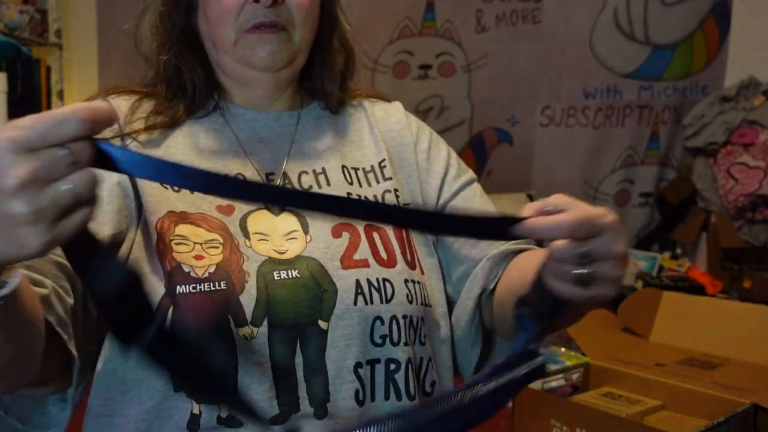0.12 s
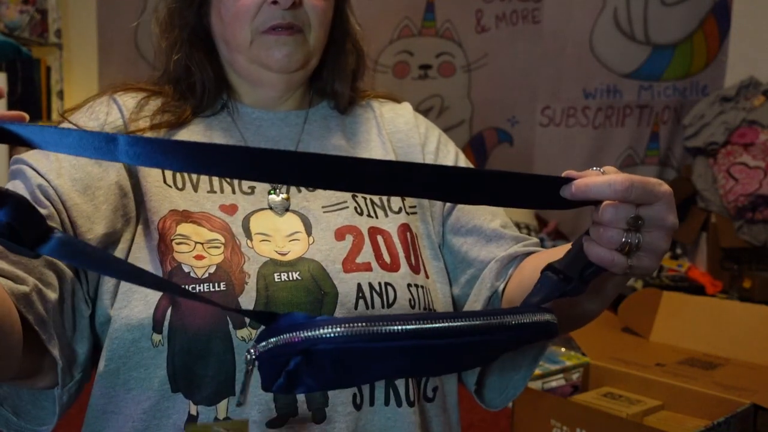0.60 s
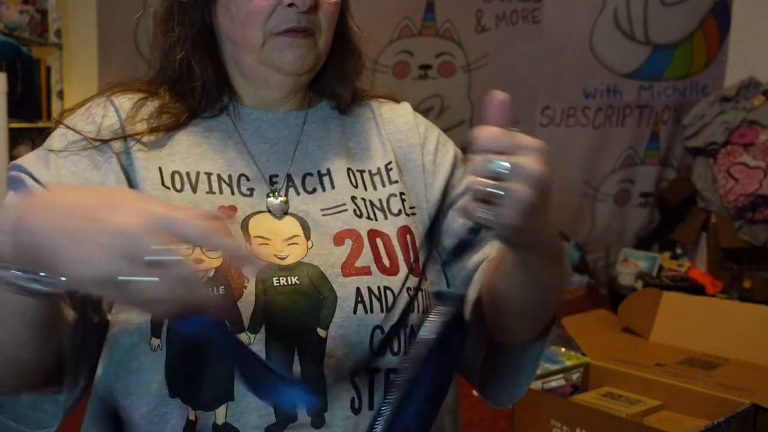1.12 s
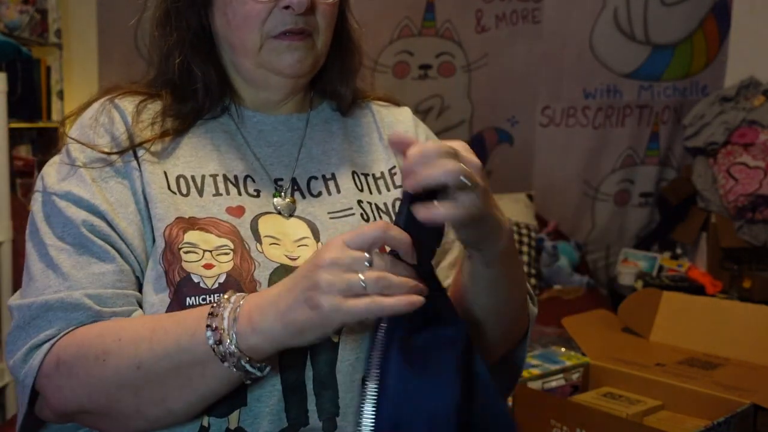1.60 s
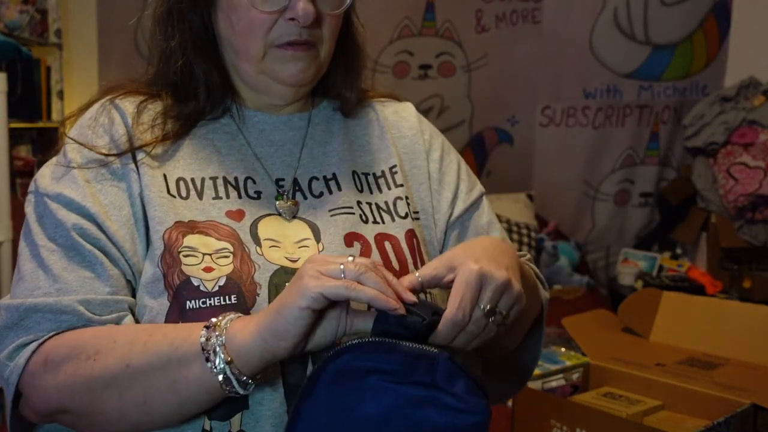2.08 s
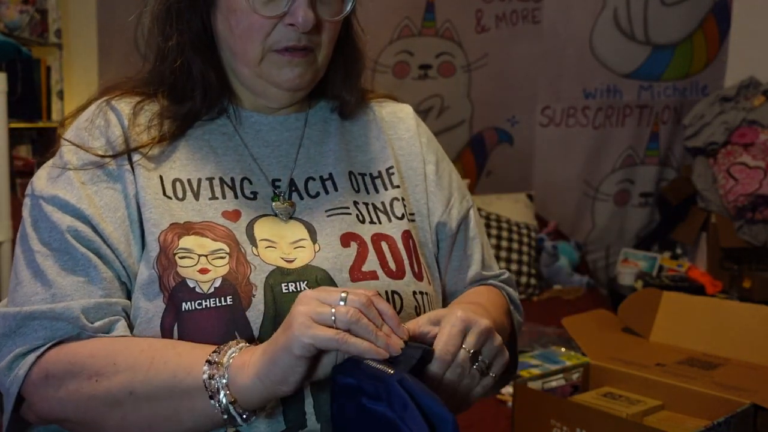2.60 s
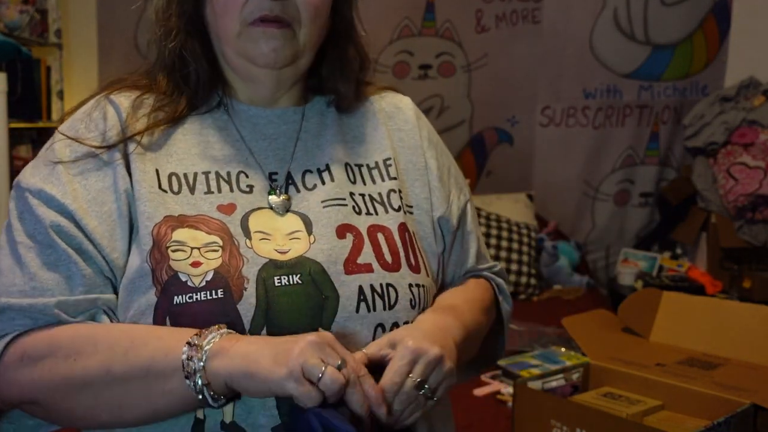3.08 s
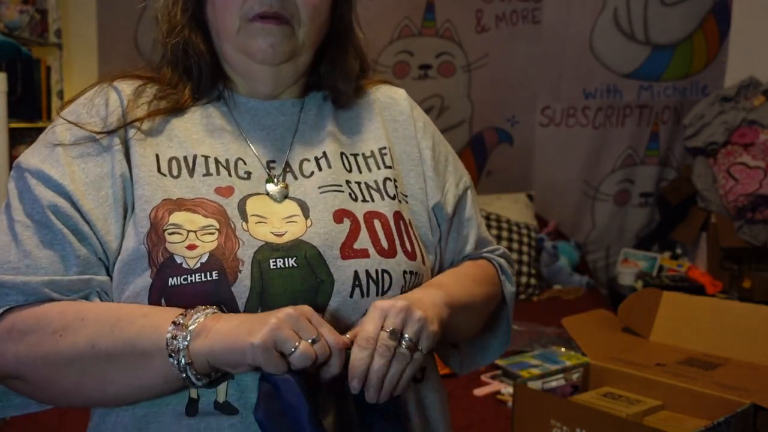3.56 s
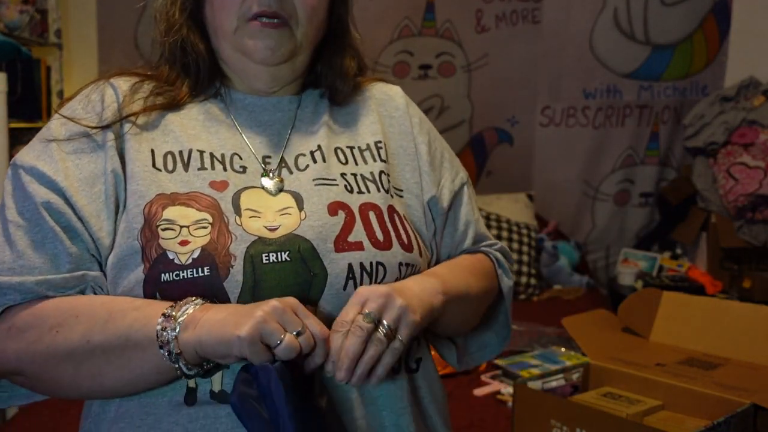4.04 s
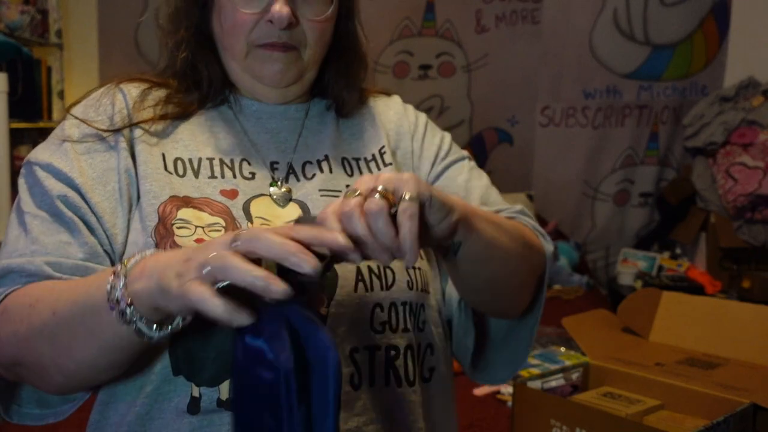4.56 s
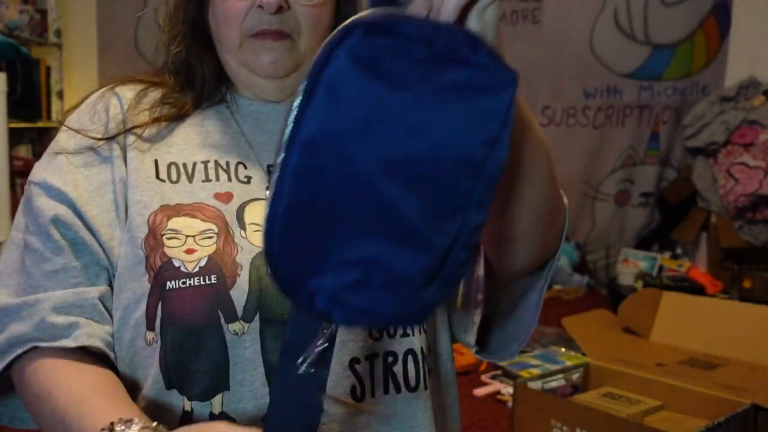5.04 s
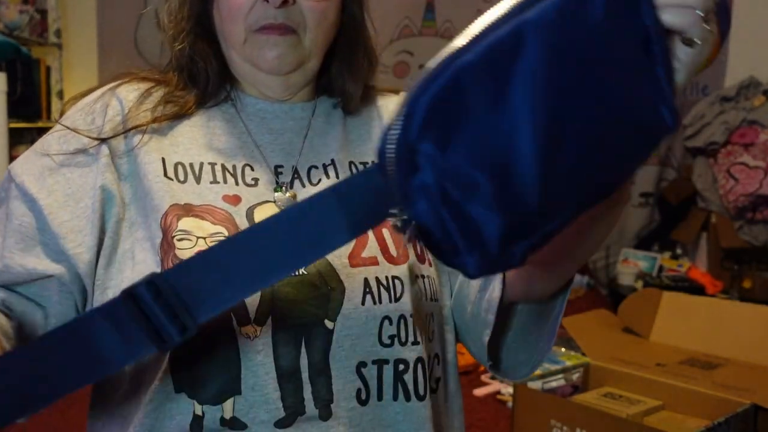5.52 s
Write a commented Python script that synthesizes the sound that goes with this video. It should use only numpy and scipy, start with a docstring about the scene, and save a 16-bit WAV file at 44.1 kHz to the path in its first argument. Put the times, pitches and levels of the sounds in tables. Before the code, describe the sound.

Over a faint, steady, wide airy hush, nylon cloth crackles in short strokes, with tiny taps and scrapes from seams, rings and buckle. Padded low bumps join after the first second. The sound thins out, then a bright cluster of clinks arrives around four seconds; the final second is busiest, with rustle, buckle clack and zip-pull tinkle. Close, fairly dry stereo.

```python
"""Small furnished room, a stereo camera close to hands that turn a nylon belt bag and its strap.
From start to end a soft fan-like hush with two humps lies behind: shaped noise, mostly unrelated left and right.
At once the cloth rustles and crackles, as noise in strokes; buckle, rings and seams tap and scrape, as struck modes.
From 0.6 s small hard parts ring as decaying sines, and from 1.4 s the bag bumps a hand with soft low pushes.
Louder clinks come near 3.9 s, the buckle clacks at 5.3 s, and the metal zip pull tinkles most in the last second."""
import sys
import numpy as np
from scipy import signal
from scipy.io import wavfile
from scipy.ndimage import uniform_filter1d

SR = 44100
rng = np.random.default_rng(int(sys.argv[2]) if len(sys.argv) > 2 else 0)


def voltage_ratio(decibels):
    """Convert decibels (scalar or array-like) to amplitude ratios, 20 dB per decade."""
    exponent = np.asarray(decibels, float) / 20
    return 10 ** exponent


def wrap_up_sound(samples):
    """Save the sound to the file named by the first command line argument, as 16-bit audio."""
    columns = np.atleast_2d(samples).T
    # keep every value between -1 and 1, then stretch to whole-number steps
    tamed = np.clip(columns, -1, 1)
    steps = np.round(tamed * 32767).astype(np.int16)
    wavfile.write(sys.argv[1], SR, steps)


N = 249165  # samples

# spectrum shape of the hush, before the humps: [f/Hz, relative level/dB per Hz]
HUSH_SPECTRUM = [(15, -70), (30, -45), (60, -18), (125, -1), (250, 1.5), (500, -1.5), (1100, -3),
                 (1600, -4), (2250, -2), (2450, -8), (4500, -14.5), (8000, -21), (16000, -26.5)]
# resonances in the hush: [f/Hz, width/Hz, gain/dB]
HUSH_HUMPS = [(859, 69, 12.5), (2130, 92, 5.5)]
# left-right likeness of the hush at the microphones: [f/Hz, likeness 0 to 1]
HUSH_LIKENESS = [(30, 0.77), (70, 0.72), (130, 0.86), (250, 0.04), (600, 0.13), (1650, 0.03), (5000, 0.022),
                 (15000, 0.79)]
# early reflections: [delay/ms, left level/dB, right level/dB], against the direct sound
EARLY_ECHOES = [(5.8, -14.5, -14), (10, -22, -25), (12, -19, -23), (18, -23, -24)]
# decay of the room: [f/Hz, t60/s]
ROOM_DECAY = [(300, 0.22), (1300, 0.18), (3500, 0.11), (9000, 0.19), (14000, 0.081)]
# the padded bag bumps a hand: [t/s, peak level/dB, f/Hz]
HAND_BUMPS = [(1.389, -55, 330), (1.39, -48.5, 504), (1.391, -50, 850), (1.451, -53, 294),
              (1.452, -48, 474), (1.453, -52, 854), (1.885, -45.5, 875), (2.174, -48.5, 770),
              (3.318, -53.5, 760), (4.233, -50, 790), (4.251, -59.5, 135), (4.59, -61, 215),
              (4.591, -41, 830), (4.806, -48, 840), (4.944, -38.5, 890), (5.107, -35, 790),
              (5.009, -46.5, 824), (5.162, -41, 854), (5.403, -42, 833)]
# touches after which a part goes on ringing: [t/s, level/dB, part]
CLINK_TOUCHES = [(0.602, -43.5, "tab"), (1.318, -57, "bead"), (1.431, -39, "tooth"), (1.692, -49.5, "pull"),
                 (1.729, -48, "link"), (1.74, -34.5, "link"), (1.746, -33, "clip"), (1.785, -42.5, "ring"),
                 (1.846, -40, "link"), (1.85, -49, "ring"), (1.877, -44.5, "ring"), (1.885, -47, "charm"),
                 (1.947, -42.5, "charm"), (1.949, -46.5, "ring"), (2.175, -48.5, "ring"),
                 (3.051, -38, "catch"), (3.914, -33.5, "clip"), (3.936, -29.5, "catch"),
                 (3.942, -33, "ring"), (3.943, -28, "tab"), (4.237, -39, "pull"), (4.238, -41.5, "tab"),
                 (4.253, -59, "pull"), (4.28, -53, "pull"), (4.373, -37, "slider"), (4.76, -40, "loop"),
                 (5.06, -59, "pull"), (5.08, -54, "pull"), (5.105, -43, "pull"), (5.174, -40.5, "pull"),
                 (5.233, -41.5, "tab"), (5.2916, -22, "buckle"), (5.567, -45.5, "pull"),
                 (5.619, -49, "pull")]
# modes of each small hard part, by name: [f/Hz, level against the touch/dB, t60/s]
PART_MODES = {"pull": [(10000, -1, 0.057)], "tab": [(6800, -3.5, 0.02)], "tooth": [(11500, 1.5, 0.014)],
              "bead": [(14000, 0, 0.14)], "ring": [(3350, 0.5, 0.078), (5260, -7, 0.058)],
              "link": [(5300, -5, 0.029), (5300, -6, .03)], "charm": [(4320, -0.5, 0.055),
              (6200, 1.5, 0.018)], "clip": [(3140, 1.5, 0.025)], "catch": [(6500, -1, 0.018),
              (6050, -8, 0.034)], "slider": [(2134, 5, 0.02), (4800, 0, 0.032), (5950, 3, 0.023),
              (7160, -3.5, 0.089)], "loop": [(2320, -4, .05)], "buckle": [(3004, -2.5, 0.026),
              (4000, -9, 0.017)]}
# taps and short scrapes: [t/s, body level/dB rms over 5 ms, ring f/Hz, crack against body/dB, scrape time/ms]
TAP_EVENTS = [(0.056, -52, 2520, -18, 2.5), (0.3624, -52.5, 1270, -9, 2.1),
              (0.4528, -56.5, 2880, -17, 0.16), (0.5009, -53.5, 3050, -13, 0.77), (0.513, -55, 3000, -9, 2),
              (0.52, -51.5, 2810, -30, 3.3), (0.5371, -42.5, 2830, 0.5, 1.0),
              (0.5415, -47.5, 2400, -10, 0.66), (0.6023, -56, 3140, -6, 0.26),
              (1.0856, -47.5, 4800, 0, 1.6), (1.1779, -53, 2170, -13, 1.8), (1.2068, -48, 4760, -9, 1.4),
              (1.214, -44.5, 1410, -4, 4.4), (1.2911, -48.5, 3330, -13, 2.2), (1.355, -44, 1280, -26, 3.5),
              (1.3901, -37, 2430, -34, 1), (1.4305, -57, 3460, 0, 1.2), (1.4484, -42, 3040, -24, 0.2),
              (1.4526, -40, 2330, -28, 3), (1.4599, -42.5, 2370, -22, 1.6), (1.572, -52, 1240, -14, 0.86),
              (1.6932, -51.5, 1200, -2, 1.9), (1.7278, -46, 5040, -22, 1.6),
              (1.7397, -46.5, 3250, -11, 1.9), (1.7453, -52, 3260, -34, 0.9),
              (1.7672, -46.5, 4770, -18, 0.12), (1.7852, -59, 3340, -8, 0.39),
              (1.8458, -42.5, 5270, -29, 0.24), (1.8642, -46.5, 1160, -20, 1.9),
              (1.8847, -49, 4500, -32, 0.87), (1.947, -50, 4620, -9, 0.48), (1.9937, -44, 2220, -37, 2),
              (2.0793, -42.5, 2200, -20, 1.27), (2.1733, -52.5, 3700, 0, 1.8),
              (2.3472, -54, 2180, -6, 0.76), (3.0158, -45, 1460, -16, 3.3),
              (3.024, -42.5, 1420, -2.5, 0.089), (3.0513, -30, 1480, -27, 0.043),
              (3.1408, -45, 1270, -11, 1.1), (3.1555, -51, 1160, -14, 1), (3.309, -48, 5440, -23, 4),
              (3.3167, -40.5, 4370, -39, 7.8), (3.5603, -54.5, 1870, -19, 1.2),
              (3.6289, -56, 2190, -13, 3.4), (3.9133, -43.5, 3250, -25, 0.91),
              (3.9362, -31.5, 6200, -13, 4.3), (3.9407, -33, 3800, -0.5, 2.2),
              (4.1276, -54.5, 2590, -23, 0.95), (4.2319, -44.5, 1970, -13, 3.4),
              (4.2547, -43.5, 2660, -15, 2.3), (4.3386, -51.5, 3300, -21, 0.11),
              (4.3733, -39, 5040, -3, 4.8), (4.475, -55, 2500, -5, 1), (4.5905, -39.5, 2020, -32.5, 0.38),
              (4.5997, -43.5, 1620, -12, 2.5), (4.6378, -52, 4160, -23, 1.5), (4.7602, -43.5, 2300, -8, 13),
              (4.7864, -37, 3470, -28, 6.5), (4.8065, -36, 4640, -28, 0.8), (4.8813, -47, 3900, -13, 0.31),
              (4.9102, -49, 1410, -12, 0.26), (4.9436, -40.5, 3660, -21, 0.85),
              (5.0093, -46, 1090, -11, 0.14), (5.0719, -59, 3100, -23, 0.14),
              (5.0808, -37.5, 3370, -27, 0.34), (5.1048, -41, 1250, -8, 2), (5.1618, -45.5, 2680, -9, 0.86),
              (5.2915, -26.5, 4000, -4.5, 0.033), (5.3885, -48, 4100, 2.5, 0.49),
              (5.4024, -44.5, 2800, -1, 0.2), (5.4171, -41.5, 3380, -5, 0.34), (5.4362, -48, 3180, -14, 1),
              (5.5619, -52.5, 1480, 4, 0.37), (5.5853, -51.5, 2720, -22, 0.84),
              (5.6236, -48, 1520, -3, 2.4)]
# spectrum shape of the cloth: [f/Hz, relative level/dB per Hz]
CLOTH_SPECTRUM = [(120, -23), (300, -26.5), (600, -7.5), (1500, -5), (4000, -3), (7500, -11.5),
                  (11000, -19), (16000, -32)]
# strokes of the hands over the cloth:
# [peak t/s, rustle level/dB, time to swell 10 dB/ms, time to fade 10 dB/ms, brightness/dB]
HAND_STROKES = [(0.05, -54.5, 300, 213, 5.5), (0.25, -68, 98, 77, 12), (0.54, -62, 144, 143, -2),
                (0.72, -75, 100, 38, 10.5), (1.08, -75, 72, 107, 19.5), (1.22, -55.5, 40, 100, -3),
                (1.3, -55, 114, 102, 3), (1.44, -49, 108, 60, -1.5), (1.58, -57, 89, 164, 3.5),
                (1.76, -58, 95, 150, 3), (1.92, -56, 126, 155, -3), (2.17, -61, 115, 100, -3),
                (2.37, -61, 100, 76, 0), (2.71, -69, 29, 92, 7), (2.82, -64.5, 44, 46, -2),
                (3.03, -52, 57, 120, 0.5), (3.2, -56, 148, 82, 0), (3.36, -62.5, 103, 123, -3),
                (3.6, -61.5, 136, 136, -1), (3.95, -48.5, 23, 50, 3), (4.04, -60.5, 62, 58, -2.5),
                (4.15, -62, 65, 195, 2.5), (4.25, -53.5, 20, 198, -1.5), (4.4, -56, 103, 142, 2.5),
                (4.6, -57.5, 92, 101, -10), (4.785, -47, 108, 47, 5.5), (4.9, -51.5, 134, 168, -2),
                (5.12, -52, 90, 150, -3), (5.3, -52.5, 104, 118, 5), (5.42, -47, 53, 138, 1),
                (5.6, -51.5, 150, 150, 4.5)]
# where the hands are: [t/s, left minus right level/dB]
HAND_SIDE = [(0, 1), (.7, 1), (1.2, -0.5), (1.8, -0.5), (2.2, 0.3), (2.8, -1.5), (3.2, 0.5), (3.9, -0.5),
             (4.3, -0.5), (4.8, 0.2), (5.65, 0)]

HUSH_DB = -60  # rms
ROOM_DB = -6  # diffuse tails against the direct sound
THUD_DB, THUD_DB_PER_OCTAVE = -14, -1  # bag body's answer to a 1 kHz tap, weaker for higher taps
AIR_DB = -19  # the thin top of each crack
TREBLE_DB, BASS_DB, DULL_BASS = -9, -6, 1  # a brighter stroke gains treble and loses bass
MIC_LOW_HZ = 40.6


def evened(x):
    """Scales to rms 1."""
    return x / np.sqrt(np.mean(x ** 2) + 1e-20)


def read(points, hz):
    """Reads a curve on a log-frequency axis."""
    f, value = np.transpose(points)
    return np.interp(np.log(hz + 1), np.log(f + 1), value)


def add(mix, s, sound):
    """Mixes a sound in at time s."""
    part = mix[round(s * SR):][:len(sound)]
    part += sound[:len(part)]


def ring(x, hz, t60):
    """Drives one decaying mode, a two-pole resonator that falls 60 dB in t60 seconds."""
    radius = 1000 ** (-1 / (t60 * SR))
    return signal.lfilter([1], [1, -2 * radius * np.cos(2 * np.pi * hz / SR), radius ** 2], x)


def band(x, low_hz, high_hz):
    """Causal band-pass."""
    edges_hz = [low_hz, min(high_hz, SR / 2.5)]
    return signal.sosfilt(signal.butter(2, edges_hz, "bandpass", fs=SR, output="sos"), x)


def hush():
    """Steady air noise with two resonant humps, mostly unrelated at the two microphones."""
    hz = np.fft.rfftfreq(2048, 1 / SR)
    a, b, c, d = rng.standard_normal((N // 512 + 5, len(hz), 4)).T
    likeness = np.clip(read(HUSH_LIKENESS, hz), -1, 1)[:, None]
    left = a + 1j * b
    right = likeness * left + np.sqrt(1 - likeness ** 2) * (c + 1j * d)
    shape_db = read(HUSH_SPECTRUM, hz)
    for hump_hz, width_hz, gain_db in HUSH_HUMPS:
        shape_db = shape_db + gain_db / (1 + (2 * (hz - hump_hz) / width_hz) ** 2)
    spectrum = np.array([left, right]) * voltage_ratio(shape_db)[:, None]
    noise = signal.istft(spectrum, nperseg=2048, noverlap=1536)[1][:, :N]
    return voltage_ratio(HUSH_DB) * evened(noise)


def room(x):
    """A few early echoes, then three diffuse tails fed in turn, each band dying at its own speed."""
    early = np.zeros((2, SR // 10))
    early[:, 0] = 1  # direct sound
    for ms, left_db, right_db in EARLY_ECHOES:
        early[:, round(ms * SR / 1000)] = voltage_ratio([left_db, right_db])
    out = signal.oaconvolve(x[None], early, axes=1)[:, :N]
    for k in range(3):
        hz, t, z = signal.stft(rng.standard_normal((2, SR // 3)), SR, nperseg=128)
        decay_db = -60 * t / read(ROOM_DECAY, hz)[:, None]
        tail = signal.istft(z * voltage_ratio(decay_db), SR, nperseg=128)[1]
        tail_t = np.arange(tail.shape[1]) / SR
        tail *= np.clip((tail_t - .002) / 0.00078, 0, 1)  # builds up after the direct sound
        tail /= np.linalg.norm(tail[0])
        # the three feeds swing in turn; their powers always sum to one
        feed = np.sqrt(2 / 3) * np.cos(np.pi * (3.1 * np.arange(N) / SR + k / 3))
        out += voltage_ratio(ROOM_DB) * signal.oaconvolve((x * feed)[None], tail, axes=1)[:, :N]
    return out


def bumps(cycles=3.8):
    """Soft low pushes of the padded bag: a sine that swells to its peak in cycles / 3 periods, then dies."""
    out, t = np.zeros(N), np.arange(SR // 8) / SR
    for s, db, hz in HAND_BUMPS:
        u = t * hz * 3 / cycles
        swell = u * np.exp(1 - u)
        add(out, s, voltage_ratio(db) * swell * np.sin(2 * np.pi * hz * t))
    return out


def rings(rattle=0.69):
    """Each touch rings the modes of one part, which waver as the loose part rattles."""
    out, t = np.zeros(N), np.arange(SR // 8) / SR
    for s, db, part in CLINK_TOUCHES:
        hz, mode_db, t60 = np.transpose(PART_MODES[part])[:, :, None]
        chance = rng.standard_normal((2, len(hz), len(t)))
        drift = evened(uniform_filter1d(chance, size=110, axis=2))
        in_phase, quadrature = rattle * np.minimum(t / 0.0044, 1) * drift
        phase = 2 * np.pi * hz * t
        wave = (1 + in_phase) * np.sin(phase) + quadrature * np.cos(phase)
        modes = voltage_ratio(db + mode_db - 60 * t / t60) * wave
        add(out, s, modes.sum(axis=0) * np.minimum(t / 0.00043, 1))  # brief onset ramp
    return out


def taps(ring_t60=0.0055, edge_db=-6, blur_db_per_ms=3.0, slips=0.42, first_ms=2.8):
    """A blow, then a rattle of smaller slips, rings the touched part, the bag body and a sharp crack."""
    out, t = np.zeros(N), np.arange(2048) / SR
    for s, db, hz, crack_db, ms in TAP_EVENTS:
        chance = rng.standard_normal(len(t))
        u = 1000 * t / max(ms, .05)
        blow = slips * chance * np.abs(np.roll(chance, 1)) * np.sqrt(u) * np.exp(1 - u)
        blow[0] = -np.exp(-ms / first_ms)  # long scrapes start softly
        edge = band(blow, 1570, min(2.57 * hz, 6500))  # deep parts give dull edges
        broad = voltage_ratio(edge_db + blur_db_per_ms * ms)  # long scrapes are cloth: more noise, less ring
        body = evened(evened(ring(edge, hz, ring_t60)) + broad * evened(edge))
        thud_db = THUD_DB + THUD_DB_PER_OCTAVE * np.log2(hz / 1000)
        thud = voltage_ratio(thud_db) * evened(ring(band(blow, 710, 1000), 930, 0.018))
        snap = band(band(blow, 4400, 7070), 4200, 14500)
        air = voltage_ratio(AIR_DB) * band(blow, 10200, 14100)
        crack = voltage_ratio(crack_db) * evened(snap + air)
        level = voltage_ratio(db) * np.sqrt(.005 / t[-1])  # from rms over 5 ms to rms over the whole tap
        add(out, s, level * (body + thud + crack))
    return out


def rustle(crackles_per_s=1500, spread_db=4, crackle=0.41, patchy_db=2.7, clump_db=1.85):
    """Fibre hiss and clumps of tiny creases, coloured in drifting patches by how the cloth is gripped."""
    clumps = voltage_ratio(clump_db * evened(uniform_filter1d(rng.standard_normal(N), size=700)))
    crease_size = voltage_ratio(spread_db * np.minimum(rng.exponential(1, N), 4))
    creases = crease_size * (rng.random(N) < crackles_per_s / SR)
    drive = rng.standard_normal(N) * clumps * (1 + crackle * evened(creases))
    hz, t, z = signal.stft(evened(drive), SR, nperseg=256, noverlap=192)
    s, db, swell_ms, fade_ms, bright_db = np.transpose(HAND_STROKES)[:, :, None]
    away_ms = 1000 * np.abs(t - s)
    stroke_db = db - 10 * away_ms / np.where(t < s, swell_ms, fade_ms)
    # middle, treble and bass of the cloth follow each stroke at their own levels
    tilts_db = (0 * bright_db, TREBLE_DB + bright_db, BASS_DB - DULL_BASS * bright_db)
    high = 1 / (1 + (6000 / (hz + 1)) ** 8)
    low = 1 / (1 + (hz / 1200) ** 6)
    power = 0
    for share, tilt_db in zip((1 - high - low, high, low), tilts_db):
        colour = evened(voltage_ratio(read(CLOTH_SPECTRUM, hz)) * np.sqrt(share))[:, None]
        stroke_power = (voltage_ratio(stroke_db + tilt_db) ** 2).sum(axis=0)
        power = power + colour ** 2 * stroke_power
    patches = uniform_filter1d(rng.standard_normal(z.shape), size=5, axis=0)  # smooth over frequency
    patches = evened(uniform_filter1d(patches, size=14, axis=1))  # and over time
    z *= np.sqrt(power) * voltage_ratio(patchy_db * patches)
    return signal.istft(z, SR, nperseg=256, noverlap=192)[1][:N]


def scene():
    """The handled bag in the room, drifting slightly left and right, over the hush."""
    bag = room(rustle() + taps() + rings() + bumps())
    side_db = np.interp(np.arange(N) / SR, *np.transpose(HAND_SIDE))
    return bag * voltage_ratio([side_db / 2, -side_db / 2]) + hush()


def top_cut(x):
    """Nothing passes above the cut-off."""
    return signal.sosfilt(signal.butter(12, 15900, fs=SR, output="sos"), x)


def record(dry):
    """The microphones drop the deepest bass."""
    low_cut = signal.butter(4, MIC_LOW_HZ, "highpass", fs=SR, output="sos")
    mix = signal.sosfilt(low_cut, dry)
    return top_cut(mix)


dry = scene()
out = record(dry)
wrap_up_sound(out)
```